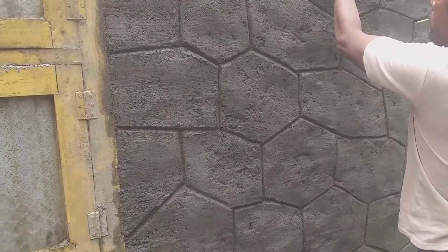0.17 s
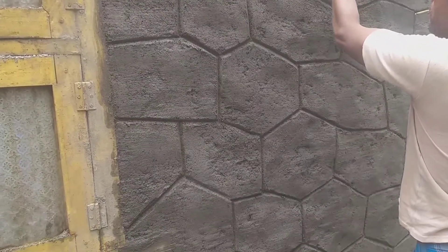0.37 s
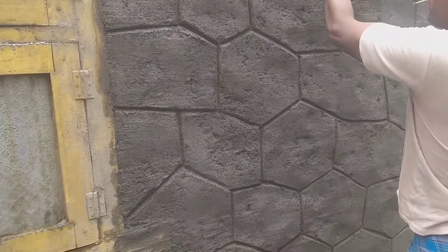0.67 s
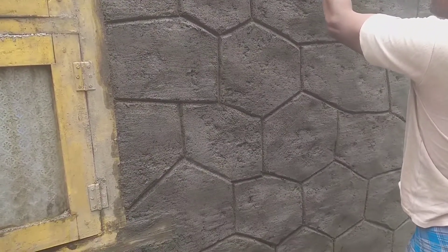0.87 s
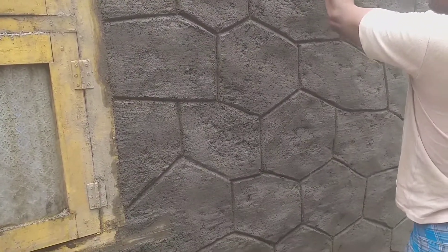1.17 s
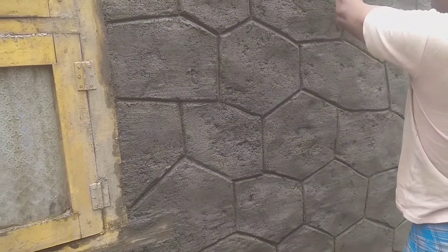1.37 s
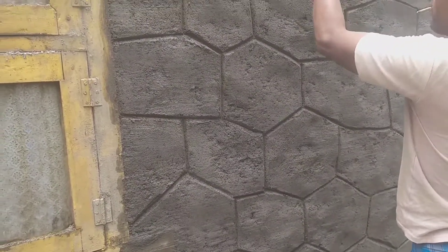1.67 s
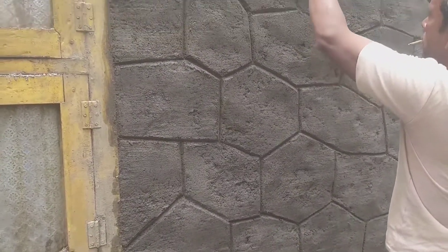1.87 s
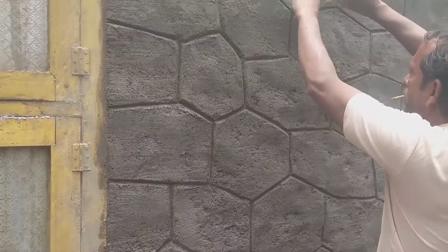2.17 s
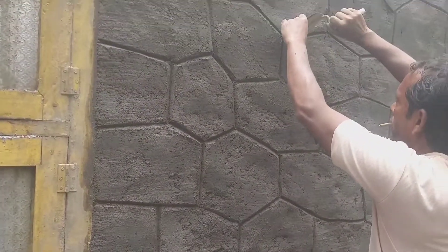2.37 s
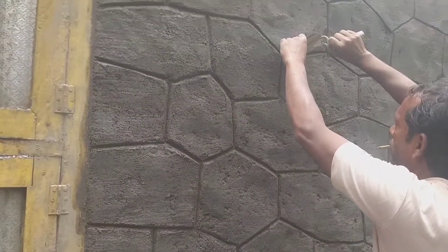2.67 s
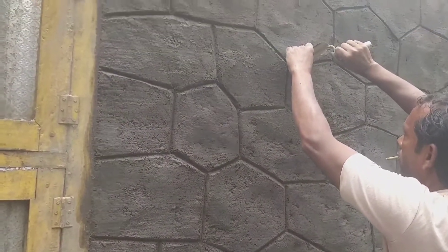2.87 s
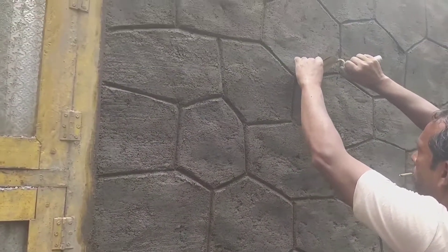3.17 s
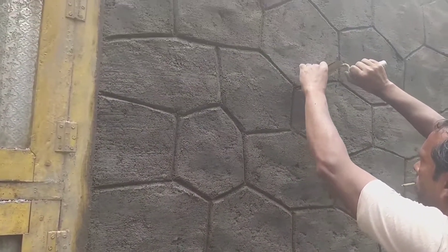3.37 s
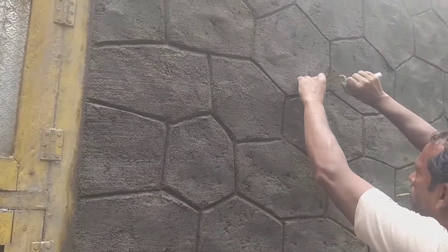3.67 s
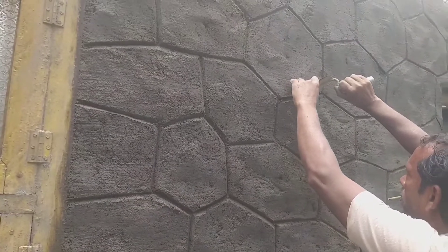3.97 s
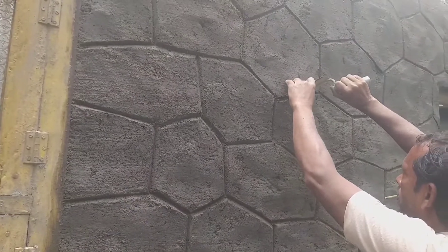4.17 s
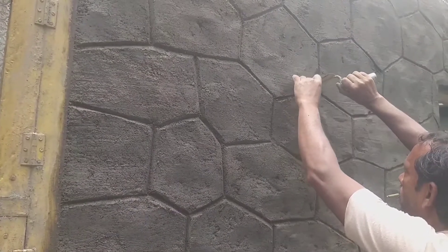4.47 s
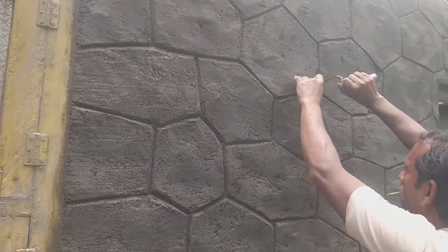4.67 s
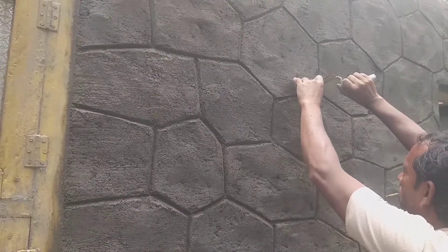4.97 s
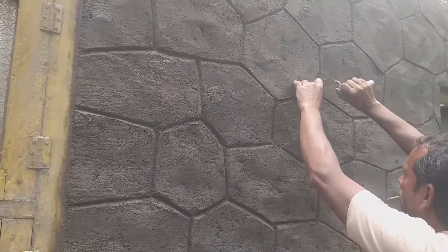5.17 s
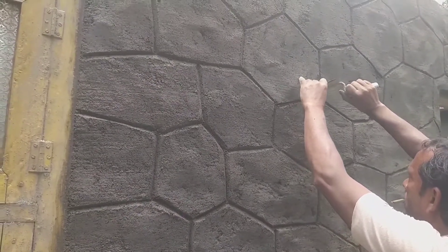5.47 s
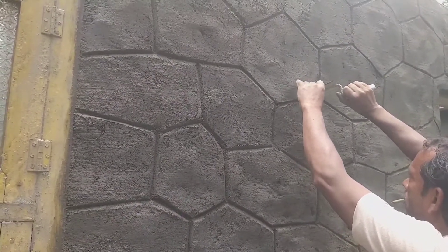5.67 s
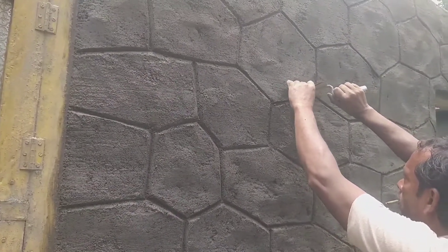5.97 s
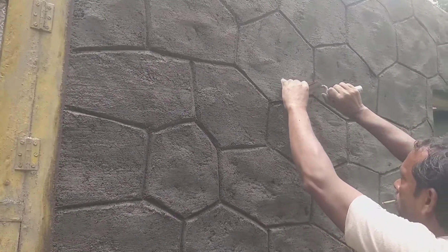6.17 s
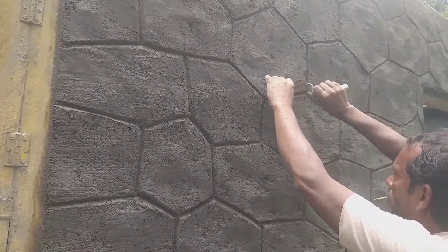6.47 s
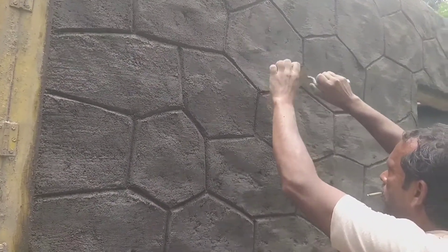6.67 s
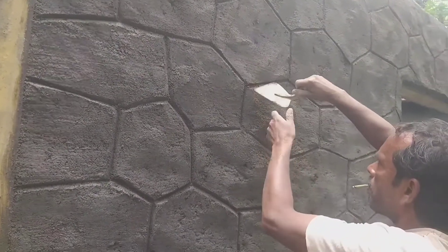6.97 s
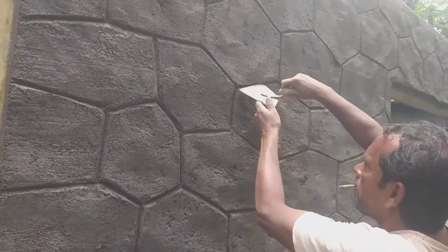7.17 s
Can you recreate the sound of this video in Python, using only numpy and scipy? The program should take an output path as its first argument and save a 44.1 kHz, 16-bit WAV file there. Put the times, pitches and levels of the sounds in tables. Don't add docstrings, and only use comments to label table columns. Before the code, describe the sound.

Outdoors, a steel blade drags over rough fresh plaster, crushing sand with a hissy, metallic rasp that swells to a hard scrape just after one second. A cluster of sharp stony snaps follows, then short dull gouging strokes of a hooked tool that boom the wall. Lighter scraping ends it. A hand-held recorder nearby picks up soft low finger bumps early and faint air rumble.

```python
import sys
import numpy as np
from scipy import signal
from scipy.fft import rfft, irfft
from scipy.io import wavfile

SR = 44100
rng = np.random.default_rng(int(sys.argv[2]) if len(sys.argv) > 2 else 0)


def voltage_ratio(level):
    return 10 ** (np.asarray(level, float) / 20)


def transcribe(signal):
    frames = np.atleast_2d(signal).T
    limited = np.clip(frames, -1, 1)
    pcm = np.round(limited * 32767).astype(np.int16)
    wavfile.write(sys.argv[1], SR, pcm)


N = 321930
FLAT = [(20, 0), (20000, 0)]   # pitch_hz, level_db


def rms_one(x):
    return x / np.sqrt(np.mean(x ** 2) + 1e-20)


def coloured(x, points, low_hz=0, high_hz=30000):
    hz = np.arange(N // 2 + 1) * SR / N + 1
    points_hz, points_db = np.transpose(points)
    shape = voltage_ratio(np.interp(np.log(hz), np.log(points_hz), points_db))
    band = 1 / np.sqrt((1 + (low_hz / hz) ** 24) * (1 + (hz / high_hz) ** 24))
    return irfft(rfft(x) * shape * band, N)


def drift(rate_hz):
    r = np.exp(-64 * np.pi * rate_hz / SR)
    noise = rng.standard_normal(N // 32 + 2002)
    slow = signal.lfilter([1], [1, -2 * r, r * r], noise)[2000:]
    return np.interp(np.arange(N) / 32, np.arange(len(slow)), rms_one(slow))


def resonance(x, hz, width_hz):
    r = np.exp(-np.pi * width_hz / SR)
    poles = [1, -2 * r * np.cos(2 * np.pi * hz / SR), r * r]
    return signal.lfilter([(1 - r * r) / 2, 0, (r * r - 1) / 2], poles, x)


def grains(per_s, spread_db, chatter_db):
    sizes = voltage_ratio(spread_db * np.minimum(rng.exponential(1, N), 5)) * rng.choice([-1, 1], N)
    born = rng.random(N) < per_s / SR
    clumps_db = chatter_db * drift(45) + 0.75 * chatter_db * drift(4.2)
    return rms_one(sizes * born * voltage_ratio(clumps_db))


def pressure(peak_s, rise_s, fall_s, db, rest_db=-150, steep=1.0, hold_s=0):
    t = np.arange(0, N + 32, 32) / SR
    late = t - np.array(peak_s)[:, None]
    before = -late / np.maximum(rise_s, .003)[:, None]
    after = np.maximum(late - hold_s, 0) / np.maximum(fall_s, .003)[:, None]
    away = np.where(late < 0, before, after)
    stroke_db = np.array(db)[:, None] - steep * 12 * away ** 1.103
    power = voltage_ratio(2 * stroke_db).sum(axis=0) + voltage_ratio(2 * rest_db)
    return np.interp(np.arange(N) / SR, t, np.sqrt(power))


def short(rows):
    return [(s, 0.41 * length, 0.59 * length, db, colour) for s, length, db, colour in rows]


# pitch_hz, level_db (per Hz)
HISS_COLOUR = [(20, 13), (60, 14), (150, -3), (1000, -4), (12000, 0), (16000, -1)]


def hiss():
    return voltage_ratio(-90) * rms_one(coloured(rng.standard_normal(N), HISS_COLOUR))


# time_s, level_db
RUMBLE_LEVELS = [(0.0, -75), (0.12, -69), (0.42, -68), (0.7, -76), (1.22, -70), (1.42, -77.5), (1.9, -81),
                 (3.25, -80.5), (3.72, -77), (4.23, -76.5), (5.2, -72), (5.41, -76.5), (5.85, -78),
                 (6.49, -74.5), (6.61, -75.5), (6.95, -75), (7.3, -76)]
# pitch_hz, level_db (per Hz)
RUMBLE_SPECTRUM = [(12, -58), (20, -15), (32, -10), (92, 3), (218, -6.5), (274, -7.5), (307, -9.5),
                   (600, -16.5), (780, -18.5), (1320, -120)]


def rumble():
    time_s, db = np.transpose(RUMBLE_LEVELS)
    level_db = np.interp(np.arange(N) / SR, time_s, db)
    noise = rms_one(coloured(rng.standard_normal(N), RUMBLE_SPECTRUM))
    return voltage_ratio(level_db + 2.5 + 2.7 * drift(8.7)) * noise


# start_s, peak_db, pitch_hz
FINGER_BUMPS = [(.2495, -30, 214), (0.7973, -33.5, 202), (1.232, -37.5, 164), (1.356, -40, 220),
                (1.654, -42, 154), (1.711, -39, 230), (1.772, -39.5, 222), (4.432, -44, 207),
                (0.273, -48, 201), (1.698, -54, 200), (1.726, -55, 179.7)]


def bumps():
    out = np.zeros(N)
    for s, db, hz in FINGER_BUMPS:
        start = round(s * SR)
        cycles = np.arange(round(4.0 * SR / hz)) * hz / SR
        swing = np.sin(2 * np.pi * 1.41 * cycles ** 0.62)
        swing *= np.sin(np.pi / 2 * np.minimum(cycles / 1.1, 1))
        swing *= np.exp(-np.maximum(cycles - 1.15, 0) / 0.57)
        out[start:][:len(swing)] += voltage_ratio(db) * swing
        creak = rng.standard_normal(3000) * np.hanning(3000)
        out[start - 1300:][:3000] += voltage_ratio(db - 8.5) * resonance(creak, hz, 150)
    return coloured(out, FLAT, 55, 490)


# start_s, peak_db, pitch_hz
PEBBLES = [
    (5.774, -42.5, 1150),
    (5.7845, -50, 950),
    (5.799, -58, 1150),
    (2.8893, -50, 1300),
    (2.566, -54, 900),
    (7.2715, -52, 1800),
]


def knocks():
    out = np.zeros(N)
    for s, db, hz in PEBBLES:
        cycles = np.arange(round(8 * SR / hz)) * hz / SR
        swing = np.sin(2 * np.pi * cycles) + 0.6 * np.sin(2 * np.pi * 1.75 * cycles)
        out[round(s * SR):][:len(swing)] += voltage_ratio(db - 3.0 - 20 * cycles / 3.6) * swing
    return coloured(out, FLAT, 600, 2800)


# pitch_hz, level_db (per Hz)
PORT_COLOUR = [(1250, -20.5), (1550, -5), (1850, -5.5), (3000, -10.5), (4100, 2.5), (5200, -0.5),
               (5700, -16), (6300, -22), (6900, -15.5), (8300, 1.5), (9800, -10.5), (12200, 2), (13300, -5),
               (15700, -1.5)]
# start_s, bright_peak_db, top_db (relative to bright), dull_peak_db
STONE_SNAPS = [(0.273, -39, -5, -42), (0.76, -23, -9, -55), (1.714, -39, 2, -57), (1.986, -44, -6, -44),
               (2.412, -34, -17, -37.5), (2.4845, -28, -16, -55), (2.4965, -27, -12, -61),
               (2.5378, -26, -12, -45), (2.665, -23.5, -9, -53), (2.7169, -37, -4, -38),
               (2.7196, -17, -9, -61), (2.7523, -32, -15, -64), (2.8687, -34, -3, -54),
               (2.8893, -53, 1, -48), (2.9017, -37, -4, -45), (2.9823, -42, -7, -56), (3.097, -29, 0, -50),
               (3.282, -46, -5, -44), (3.296, -40, -8, -42), (3.4057, -35, -12, -26), (6.082, -43, 10, -58),
               (4.7334, -35, -3, -49), (5.1104, -31.5, 0, -44), (5.1348, -38, -14, -42.5),
               (5.3295, -39.5, -1, -50), (5.955, -45, 1.5, -56), (5.9853, -37, -6, -48),
               (6.11, -41, 3, -57.5), (6.613, -34, 1.5, -45), (7.2713, -48, -8, -40),
               (2.4633, -30, -16, -55), (2.4935, -30, -10, -58), (2.547, -36, -8, -52),
               (2.587, -46, 8, -58), (2.7045, -36, -8, -58), (2.934, -37, -6, -52), (3.055, -40, -4, -56),
               (3.3785, -42, -6, -50), (3.47, -36, -3, -44), (4.059, -44, -3, -50), (4.129, -48, -4, -50),
               (4.295, -45, -4, -54), (4.845, -42, -4, -46), (5.001, -50, -4, -46), (5.0305, -44, -4, -43),
               (5.17, -38, -2, -50)]


def snaps():
    parts, t = np.zeros((3, N + 3000)), np.arange(3000) / SR
    for s, db, top_db, dull_db in STONE_SNAPS:
        crack = np.abs(t - .002) < .4 / SR
        burst = rng.standard_normal(3000) + (3 + voltage_ratio(db + 31)) * crack
        decay_s = 0.017 + .0004 * max(-26 - db, 0)
        fade_db = np.minimum(-60 * (t - .002) / decay_s, -7000 * (.002 - t))
        dull_fade_db = 0.46 * fade_db * decay_s / 0.017
        levels_db = [db + fade_db, db + top_db + fade_db, dull_db + 4.0 + dull_fade_db]
        parts[:, round((s - .001) * SR):][:, :len(t)] += burst * voltage_ratio(levels_db)
    bands_hz = [(6300, 10200), (10200, 14000), (800, 5500)]
    return voltage_ratio(-2.0) * sum(coloured(part[:N], PORT_COLOUR, *band) for part, band in zip(parts, bands_hz))


# start_s, end_s, pitch_hz, level_db
SINGING_MODES = [(0.13, 0.5, 1830, -65), (.17, .205, 1825, -64), (.3, .36, 1835, -62),
                 (.375, .43, 1830, -57), (.43, .482, 1820, -53), (.505, 0.555, 1815, -56),
                 (0.453, 0.703, 4020, -53), (0.476, 0.528, 4750, -45.5), (0.777, 0.95, 1600, -71),
                 (1.246, 1.337, 4150, -45), (1.248, 1.298, 4390, -44), (2.553, 2.57, 880, -64),
                 (2.746, 2.771, 1020, -62.5), (5.835, 5.86, 1750, -69), (5.88, 5.897, 1750, -67),
                 (5.876, 5.997, 2475, -72), (3.395, 3.45, 1920, -46), (5.36, 5.434, 1680, -75),
                 (6.105, 6.219, 1817, -66), (6.9, 7.025, 1797, -61.5), (7.03, 7.13, 1830, -62),
                 (7.05, 7.207, 2440, -61.5), (7.138, 7.167, 1885, -57), (7.2, 7.29, 1830, -61),
                 (2.001, 2.2, 1740, -65), (2.2, 2.36, 1760, -67), (2.39, 2.56, 1740, -65.5),
                 (2.64, 2.79, 1750, -68.5), (4.13, 4.18, 2080, -56), (6.3, 6.6, 1800, -67),
                 (2.2, 2.36, 5220, -60), (3.278, 3.307, 4760, -54), (4.055, 4.1, 4290, -57),
                 (6.58, 6.597, 3550, -54), (6.61, 6.63, 3550, -56), (7.268, 7.295, 4800, -57)]


def singing():
    out = np.zeros(N)
    cracks = grains(per_s=6000, spread_db=2.0, chatter_db=1.0)
    for start_s, end_s, hz, db in SINGING_MODES:
        a, b = round(start_s * SR), round(end_s * SR)
        ring = rms_one(resonance(cracks[a:b], hz, 0.017 * hz))
        out[a:b] += voltage_ratio(db) * ring * np.hanning(b - a) ** 0.16
    return out


# peak_s, rise_s, fall_s, level_db, boom_db (wall, relative)
HOOK_DIGS = [
    (3.497, 0.03, 0.16, -53.5, -33),
    (3.852, 0.02, 0.05, -58.5, -2.5),
    (4.128, 0.016, 0.04, -57.5, -5),
    (4.393, 0.022, 0.045, -52, -5.5),
    (4.594, 0.024, .05, -52, -10),
    (4.81, 0.02, 0.055, -52, -9),
    (5.014, .015, .055, -49, -10),
]
# peak_s, rise_s, fall_s, level_db
HOOK_GRAZES = [(.01, .03, 0.075, -63), (.51, 0.024, 0.13, -59), (.81, 0.08, 0.089, -79),
               (1.25, 0.26, 0.093, -65), (1.76, 0.21, 0.1, -72.5), (1.98, 0.029, 0.7, -74.5),
               (2.23, 0.062, 0.62, -68.5), (2.54, 0.072, 0.073, -63), (2.77, 0.18, 0.047, -68),
               (2.9, 0.1, 0.076, -76), (3.24, 0.99, 0.22, -78.5), (3.41, .045, .2, -70),
               (3.93, .03, .06, -70), (4.21, .03, .07, -69), (4.49, .04, .1, -68), (4.76, .04, .06, -66),
               (5.12, .04, .08, -68), (5.37, 0.092, 0.076, -67.5), (5.78, 0.02, 0.065, -70),
               (6.62, 0.82, 0.084, -69.5), (6.93, 0.26, 0.97, -69.5), (7.15, 0.18, 0.051, -72),
               (7.3, 0.048, .1, -73)]
# pitch_hz, level_db (per Hz)
PLOUGH_COLOUR = [(260, -26), (450, -15.5), (590, -3.5), (924, -0.5), (1170, -0.5), (1470, 1.5), (1830, 6),
                 (2600, -38), (3380, -47), (5720, -120)]


def hook():
    rest_db = -82
    bite_hold_s, tear_hold_s, tear_lag_s = .026, .03, .008
    *when, db, boom_db = np.transpose(HOOK_DIGS)
    graze = pressure(*np.transpose(HOOK_GRAZES))
    bite = np.hypot(pressure(*when, db - 0.5, rest_db, 1.18, bite_hold_s), graze)
    tear = np.roll(pressure(*when, db, rest_db, .95, tear_hold_s), round(tear_lag_s * SR))
    tear = np.hypot(tear, graze)
    thrust = pressure(*when, db + boom_db, -88, 1.87, bite_hold_s)

    cracks = grains(per_s=1800, spread_db=0.5, chatter_db=2.0)
    shank_hz = np.geomspace(210, 2100, 18)
    shank = sum(voltage_ratio(4.2 * drift(9)) * resonance(cracks, hz, 55) for hz in shank_hz)
    sound = cracks + voltage_ratio(-1.0) * shank
    boom = rms_one(coloured(sound, [(150, 1.0), (500, -4.3)], 107, 536))
    plough = rms_one(coloured(sound, PLOUGH_COLOUR))
    dull = coloured(plough, FLAT, 0, 1150)
    return voltage_ratio(3) * (bite * dull + tear * (plough - dull)) + thrust * boom


def blade_modes(cracks):
    pitches_hz = np.geomspace(1400, 14500, 64) * voltage_ratio(rng.normal(0, .08, 64))
    out = np.zeros(N)
    for k, hz in enumerate(pitches_hz):
        fed = voltage_ratio(np.minimum(5.5 * drift(8), 10) - 10)
        out += fed * resonance(cracks, hz, 35 + 0.011 * hz) * (-1) ** k
    return out


# peak_s, rise_s, fall_s, ring_db, lower_modes_db (relative)
BLADE_DRAGS = [(0.0, .05, 0.077, -51, -15), (.21, 0.12, 0.21, -48, -15), (.53, 0.29, 0.31, -46.5, -10),
               (.83, 0.17, 0.19, -46.5, -13), (1.21, 0.16, 0.11, -44.5, -12.5),
               (1.32, 0.046, 0.015, -44, -14), (1.722, 0.028, 0.11, -52, -14), (1.99, 0.02, .22, -61.5, -5),
               (2.24, 0.052, .18, -51.5, -8.5), (2.46, 0.17, 0.057, -63.5, 3.5),
               (2.68, 0.21, 0.34, -61.5, -11.5), (2.9, .06, 0.21, -62.5, -9),
               (3.135, 0.085, .025, -50.5, -19), (3.284, 0.0076, 0.047, -52, -30),
               (3.411, 0.011, 0.076, -44, -4.5), (3.6, 0.18, 0.18, -46.5, -5), (4.53, 0.17, 0.12, -52, -16),
               (4.75, 0.032, 0.13, -48.5, -16), (5.17, 0.13, 0.09, -53, -13.5),
               (5.37, 0.14, 0.16, -58.5, -15.5), (5.95, 0.1, 0.5, -57, -18), (6.36, 0.15, 0.58, -52.5, -17),
               (6.62, 0.31, 0.1, -57.5, -4), (7.16, 0.47, .1, -54.5, -9.5)]
# peak_s, length_s, ring_db, lower_modes_db (relative)
BLADE_TOUCHES = [
    (1.02, 0.13, -58.5, -12),
    (2.14, 0.23, -68, 7.5),
    (3.388, .03, -51, -17),
    (3.85, 0.29, -53, -15),
    (4.075, 0.18, -56, -16),
    (4.205, 0.075, -50.5, -15),
    (5.85, 0.14, -62.5, -20),
    (6.7, 0.084, -60.5, -1.5),
]
RESTING_DB = [-77, -78.5, -68.5, -76, -83, -92]
DIG_SHAKE_DB = [-2, -17, 0.0]


def blade_gains():
    *when, db, lower_db = np.transpose(BLADE_DRAGS + short(BLADE_TOUCHES))
    own_db = [db - 6.5 + 0.79 * lower_db, db + lower_db, db]
    dig = pressure(*np.transpose(HOOK_DIGS)[:-1], hold_s=.018)
    dig = np.roll(dig, round(.01 * SR))
    graze = pressure(*np.transpose(HOOK_GRAZES))
    low, middle, ring = [np.hypot(pressure(*when, level_db, rest_db), voltage_ratio(shake_db) * dig)
                         for level_db, rest_db, shake_db in zip(own_db, RESTING_DB, DIG_SHAKE_DB)]
    return [np.hypot(low, voltage_ratio(-5) * graze), middle, ring]


# peak_s, rise_s, fall_s, grit_db, finer_grit_db (relative)
EDGE_SWEEPS = [(0.0, .05, 0.087, -53, 0.5), (.52, 0.4, 0.58, -44, -2), (.85, 0.23, 0.031, -48, -6),
               (1.13, .1, 0.11, -55, -4), (1.269, 0.21, 0.045, -39, -3.5), (1.73, 0.078, 0.12, -56, -1.5),
               (2.3, 0.22, 0.1, -54, -1.5), (2.61, 0.29, 0.37, -55.5, -5), (3.02, 0.16, 0.14, -56, -0.5),
               (3.13, 0.13, 0.049, -55.5, 7), (3.43, 0.089, .3, -51, -4), (3.62, 0.42, .25, -50.5, -13),
               (3.85, 0.12, 0.22, -53, -9), (4.5, 0.12, .35, -58, -1), (4.75, 0.043, 0.16, -52, 0.5),
               (5.12, 0.027, 0.17, -51, 3.5), (5.34, 0.026, 0.11, -53.5, -7),
               (5.82, 0.17, 0.43, -62.5, -16), (6.5, 0.68, 0.19, -53, 3.5), (6.625, 0.27, .02, -54, 4),
               (6.85, .2, 0.63, -58.5, -4.5)]
# peak_s, length_s, grit_db, finer_grit_db (relative)
EDGE_FLICKS = [(0.186, 0.072, -52.5, 8.5), (1.318, 0.035, -39.5, -10), (1.533, 0.1, -58.5, -10),
               (1.992, 0.087, -59, 0), (2.462, 0.056, -48.5, -5), (2.496, 0.023, -46, -7),
               (2.88, .06, -68, 13), (3.29, 0.055, -61, 1.5), (4.087, 0.11, -54.5, -1.5),
               (4.191, 0.088, -52, 5), (4.32, 0.18, -57, -9), (5.03, .09, -57.5, -18),
               (5.966, 0.055, -53, 6)]


def grit_gains():
    *when, db, fine_db = np.transpose(EDGE_SWEEPS + short(EDGE_FLICKS))
    dust_db = db - 5 + 0.74 * (db + 52) + .3 * fine_db
    return [pressure(*when, db, RESTING_DB[3]),
            pressure(*when, db + fine_db, RESTING_DB[4]),
            pressure(*when, dust_db, RESTING_DB[5], 1.55)]


# middle_s, half_length_s, loss_db
TROWEL_LIFTS = [
    (.975, 0.062, 8.5),
    (1.61, 0.032, 2),
    (1.94, 0.045, 3),
    (2.387, .04, 4),
    (3.344, .04, 5.5),
    (4.03, .04, 3),
    (4.985, 0.017, 2),
    (5.597, .13, 5),
    (1.45, .04, 2.5),
    (6.65, .018, 7),
]


def contact():
    t = np.arange(0, N + 32, 32) / SR
    loss_db = sum(db * np.exp(-((t - s) / half_s) ** 2) for s, half_s, db in TROWEL_LIFTS)
    return np.interp(np.arange(N) / SR, t, voltage_ratio(-loss_db))


BAND_SPLITS = (2300, 3200, 6300, 10000, 13000)


def trowel():
    cracks = grains(per_s=9000, spread_db=1.5, chatter_db=0.68)
    sound = cracks + voltage_ratio(4.0) * blade_modes(cracks)
    edges_hz = (1, *BAND_SPLITS, SR)
    out = np.zeros(N)
    for gain, low_hz, high_hz in zip(blade_gains() + grit_gains(), edges_hz, edges_hz[1:]):
        band = rms_one(coloured(sound, PORT_COLOUR, low_hz, high_hz))
        out += gain * voltage_ratio(0.44 * drift(22)) * band
    return contact() * out


# pitch_hz, width_hz, share (of the sound)
PORT_DIFFERENCES = [
    (1840, 960, 0.28),
    (9780, 1300, -0.27),
    (8740, 1000, 0.087),
]


def port_difference(mid):
    echo = np.roll(mid, 431)
    side = 0.02 * voltage_ratio(3 * drift(12)) * np.diff(echo, prepend=0) + 0.0089 * echo
    for hz, width_hz, share in PORT_DIFFERENCES:
        ringing = mid + echo
        for _ in range(3):
            ringing = resonance(ringing, hz, width_hz)
        side += share * voltage_ratio(2.5 * drift(15) - 1) * ringing
    return side


def scene():
    mid = rumble() + bumps() + knocks() + snaps() + singing() + hook() + trowel()
    side = port_difference(mid) + hiss()
    return np.array([mid + side, mid - side])


def band_limit(x):
    return signal.sosfilt(signal.butter(12, 15760, fs=SR, output="sos"), x)


def record(dry):
    top_cut = signal.cheby2(20, 60, 15950, fs=SR, output="sos")
    mix = signal.sosfilt(top_cut, dry)
    return band_limit(mix)


dry = scene()
out = record(dry)
transcribe(out)
```